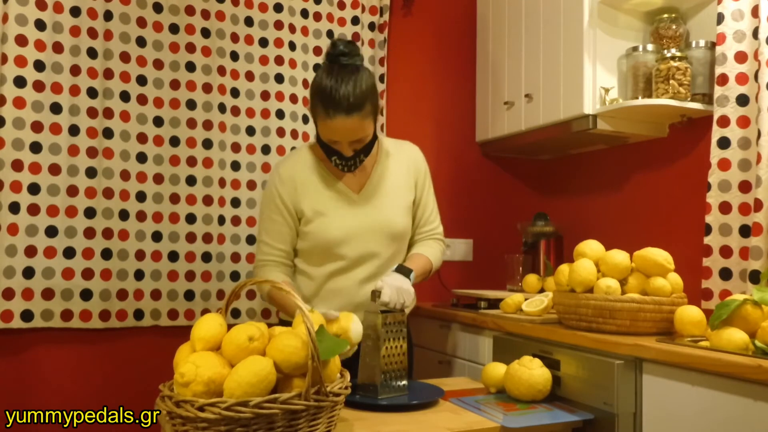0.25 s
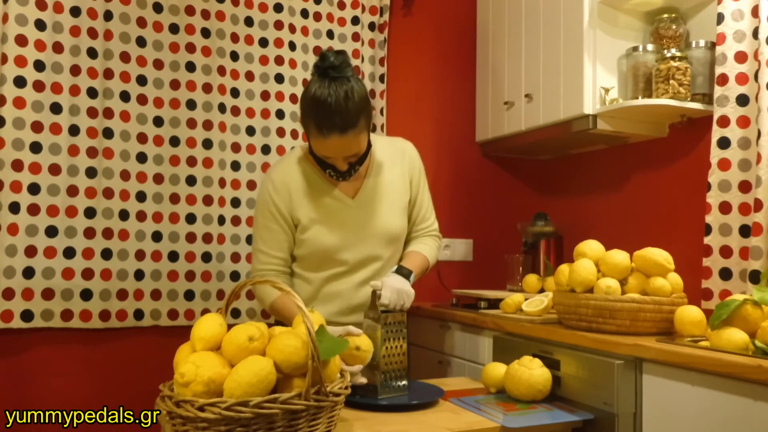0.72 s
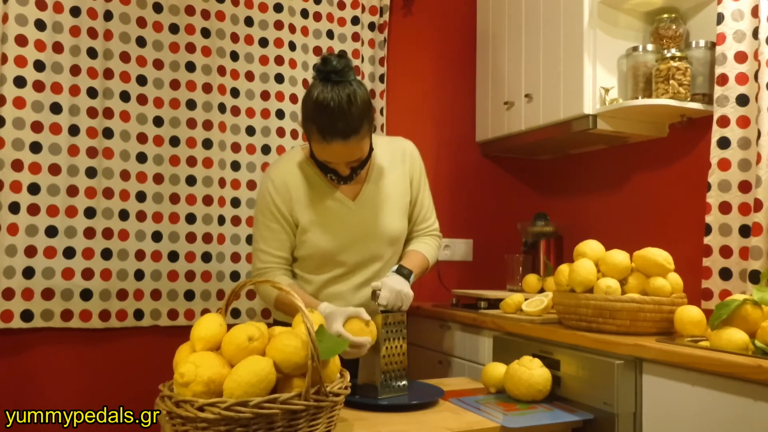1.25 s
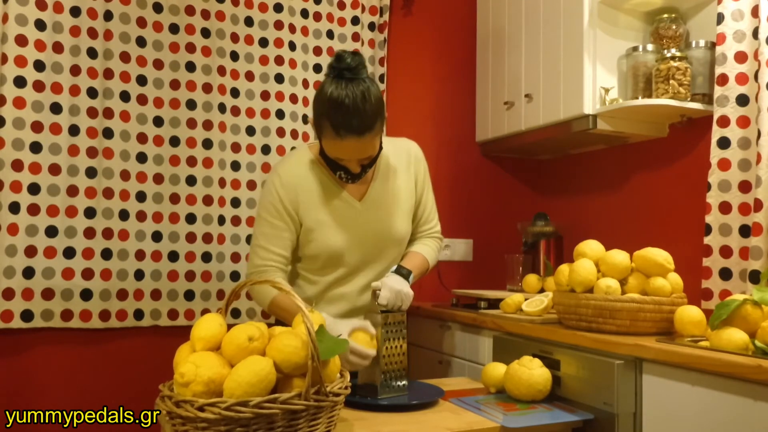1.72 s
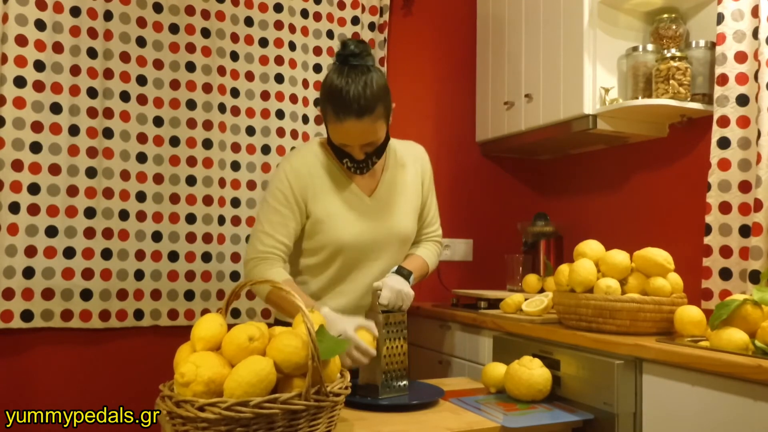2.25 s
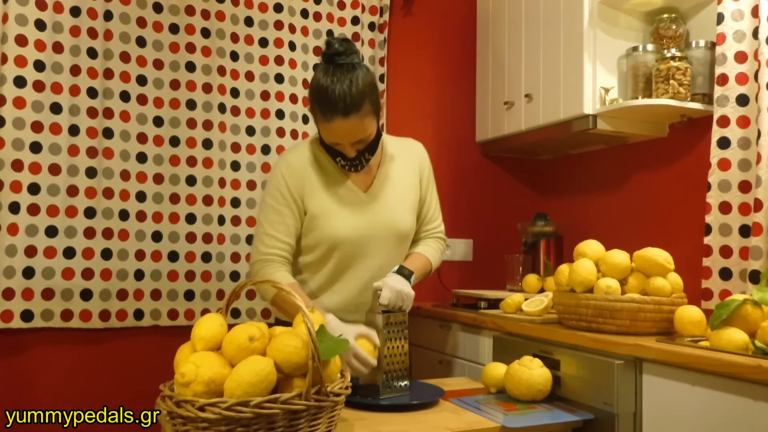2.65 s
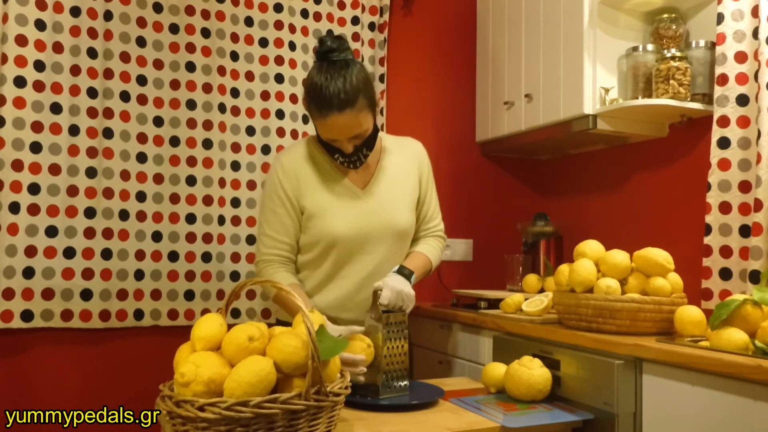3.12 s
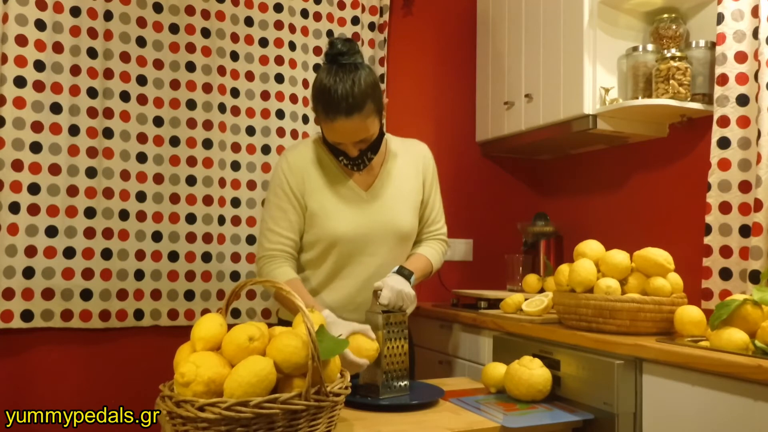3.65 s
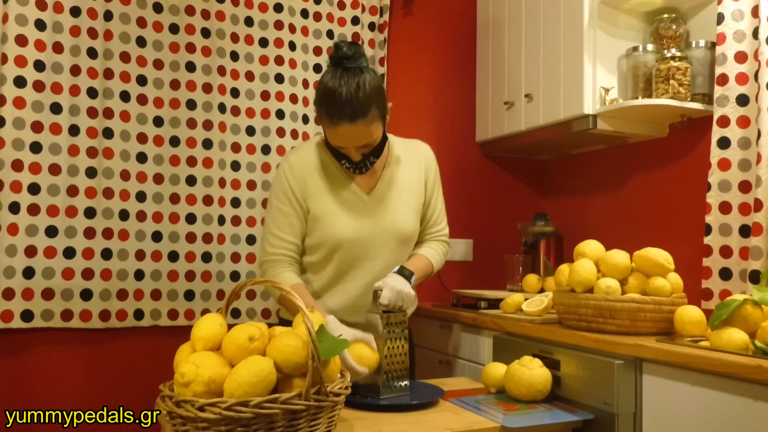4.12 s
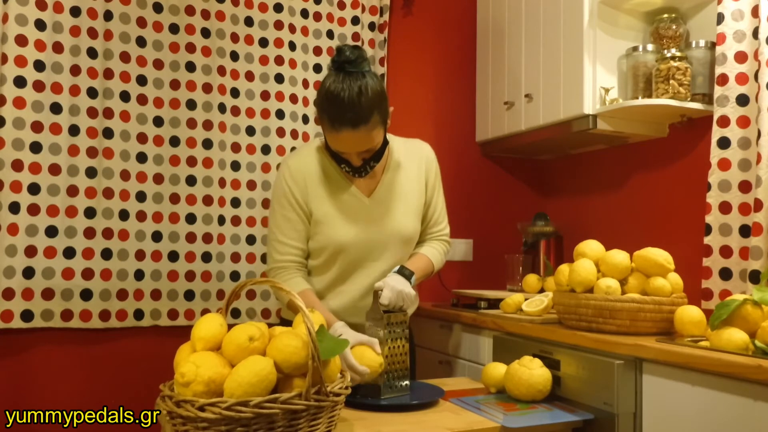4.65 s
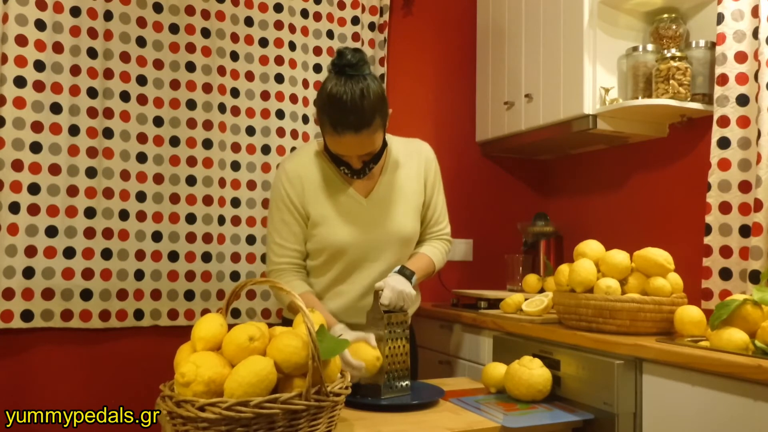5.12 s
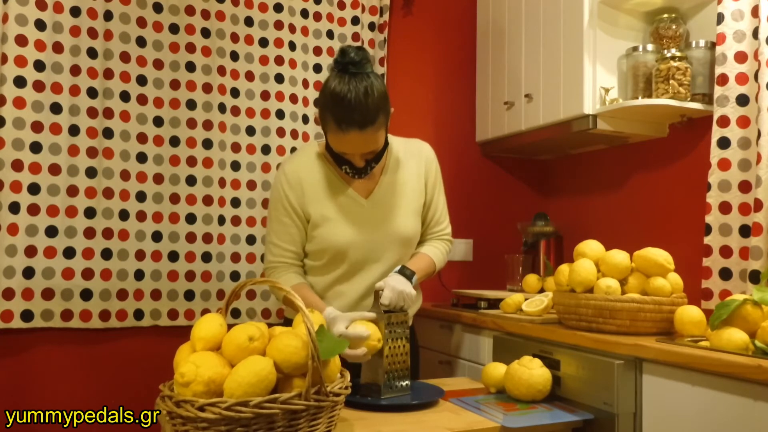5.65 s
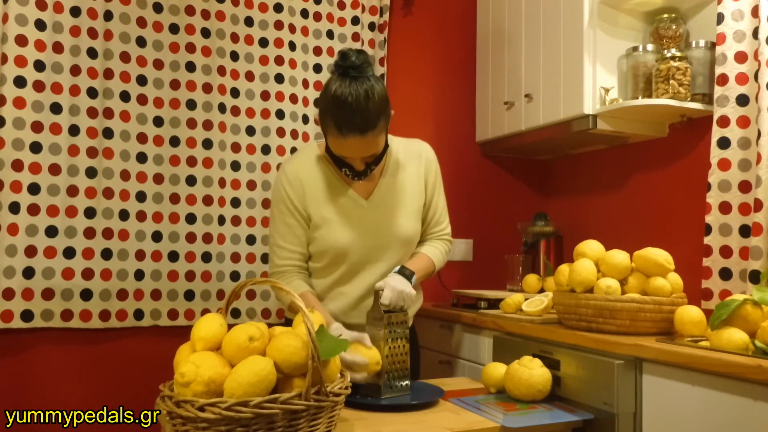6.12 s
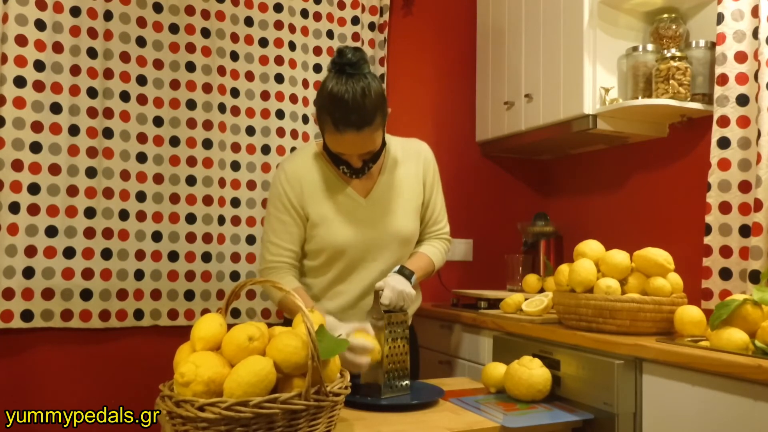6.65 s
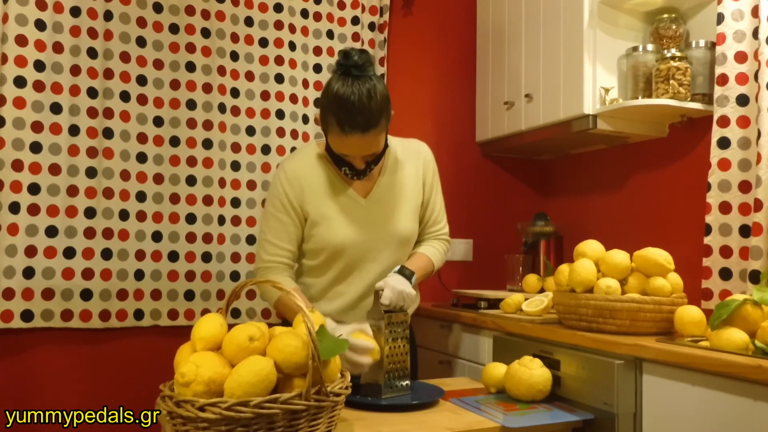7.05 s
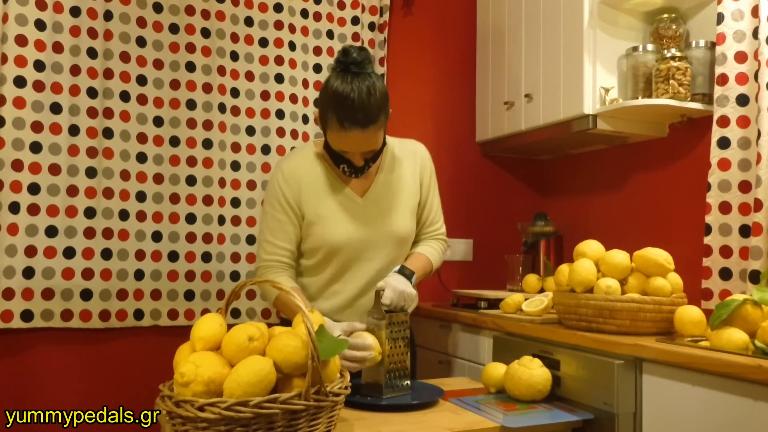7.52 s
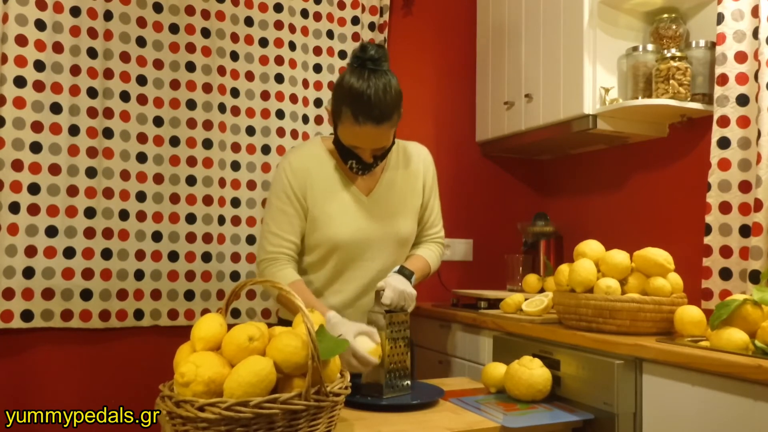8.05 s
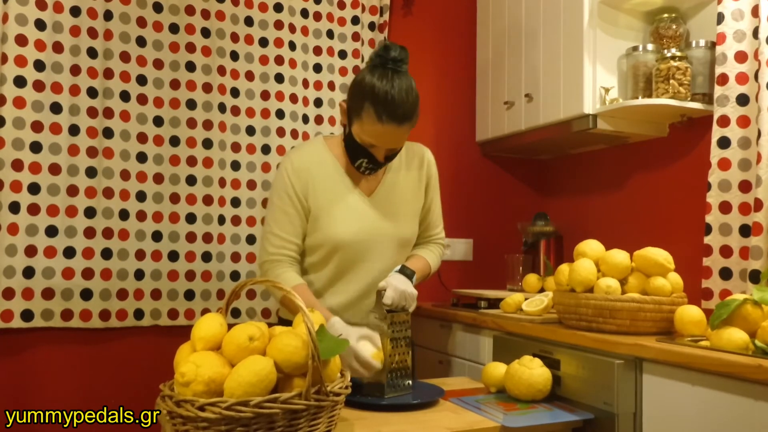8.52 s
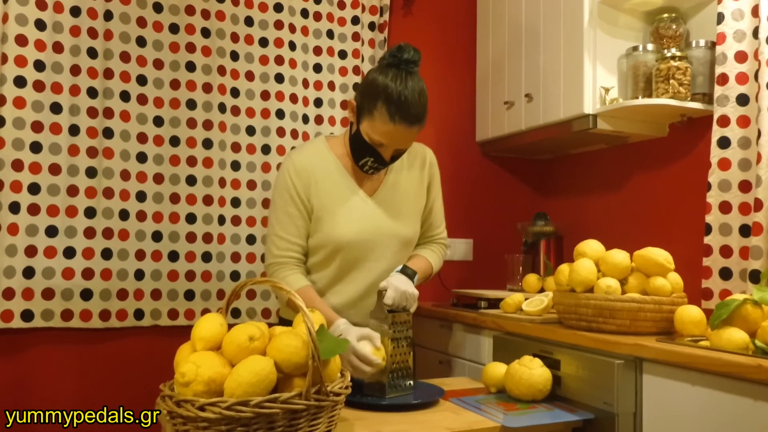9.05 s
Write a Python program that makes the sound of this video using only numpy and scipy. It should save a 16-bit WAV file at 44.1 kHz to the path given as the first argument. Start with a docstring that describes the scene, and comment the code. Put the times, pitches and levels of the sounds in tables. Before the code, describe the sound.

Quick rasping strokes of lemon peel against a steel grater come in four bursts over a faint room hiss.

```python
"""Zesting a lemon on a box grater

A steel grater stands on a plate in a small kitchen: four runs of five to seven firm down-strokes, with
light returns between. The teeth snag and tear the peel; each snag rings the box and gives a bright rasp.
Now and then the fruit catches and knocks the box or makes it sing. Dry ticks sound over a room hiss."""
import sys
import numpy as np
from scipy import signal
from scipy.fft import rfft, irfft, next_fast_len
from scipy.io import wavfile

SR = 44100
rng = np.random.default_rng(int(sys.argv[2]) if len(sys.argv) > 2 else 0)


def log_audio(samples):
    """Write samples as a 16-bit WAV file to the path given in sys.argv[1]."""
    # one column per channel
    frames = np.atleast_2d(samples).T
    # limit to full scale, then quantise
    limited = np.clip(frames, -1, 1)
    pcm = np.round(limited * 32767).astype(np.int16)
    wavfile.write(sys.argv[1], SR, pcm)


N = 410130
TIME = np.arange(N) / SR
CUTOFF_HZ = 13200


def from_db(db):
    """Decibels to gain."""
    return np.exp(np.asarray(db) * (np.log(10) / 20))


def unit_rms(x):
    """Scale to rms 1."""
    return x / np.sqrt(np.mean(x ** 2) + 1e-20)


def at_hz(curve, hz):
    """Read a curve on a log-frequency axis."""
    curve_hz, values = np.transpose(curve)
    return np.interp(np.log(hz), np.log(curve_hz), values)


def cut(x, hz, kind, order):
    """Butterworth filter."""
    return signal.sosfilt(signal.butter(order, hz, kind, fs=SR, output="sos"), x)


def panned(x, left_db):
    """Tip a sound sideways; left_db is left minus right."""
    return x * from_db([[left_db / 2], [-left_db / 2]])


def drift(rate_hz, at):
    """Smooth random modulation with rms 1, read at the given samples."""
    step, warm_up = 40, 2000
    pole = np.exp(-2 * np.pi * rate_hz * step / SR)
    noise = rng.standard_normal(N // step + warm_up + 2)
    slow = signal.lfilter([1], [1, -2 * pole, pole ** 2], noise)[warm_up:]
    return unit_rms(slow)[at // step]


def resonate(x, hz, width_hz):
    """A resonance that keeps the power of a white input."""
    radius = np.exp(-np.pi * width_hz / SR)
    zeros = np.sqrt((1 - radius ** 2) / 2) * np.array([1, 0, -1])
    poles = [1, -2 * radius * np.cos(2 * np.pi * hz / SR), radius ** 2]
    return signal.lfilter(zeros, poles, x + 1e-18)


def room_hiss(centre_gain):
    """A steady, dull bed of noise, nearly unrelated on the two sides."""
    # room tone spectrum: (frequency [Hz], relative density [dB])
    spectrum = [(15, -73), (25, -36), (92, -19), (130, -16.5), (192, -9.5), (237, -8), (333, -3), (400, -3),
                (481, -1), (770, -2), (1230, -4), (2370, -13.5), (3160, -21.5), (4690, -21), (13000, -38)]
    size = next_fast_len(N)
    left, right, centre = rng.standard_normal((3, size))
    white = np.array([left, right]) + centre_gain * centre
    hz = np.arange(1, size // 2 + 2) * SR / size
    return unit_rms(irfft(rfft(white) * from_db(at_hz(spectrum, hz)), size)[:, :N])


def kitchen(x, dull_t60, bright_t60, wet_db, side_db, scatter_hz, early_db, early_s):
    """Dense reflections widen the lows and trail the treble; the first, off the worktop, sound metallic."""
    t = TIME[:SR // 2]
    mid, side = rng.standard_normal((2, len(t))) * (t > .001)
    scattered = cut(mid, scatter_hz, "high", order=2)
    diffuse = scattered + from_db(side_db) * side * [[1], [-1]]
    dull = cut(diffuse, 2000, "low", order=1)
    tail = dull * 1000 ** (-t / dull_t60) + (diffuse - dull) * 1000 ** (-t / bright_t60)
    tail /= np.sqrt(np.sum(tail ** 2) / 2)
    early = cut(scattered, 1630, "high", order=2) * np.exp(-t / early_s)
    response = from_db(wet_db) * tail + from_db(early_db) * early / np.linalg.norm(early)
    return x + signal.fftconvolve(x, response, axes=1)[:, :N]


def squeak(time_s, half_s, hz, level_db):
    """One brief, thin whistle."""
    return from_db(level_db) * np.exp(-((TIME - time_s) / half_s) ** 2) * np.sin(2 * np.pi * hz * TIME)


def dry_ticks(attack_s, lag_s):
    """Small damped ticks close by on the left; they reach the right side a little later."""
    # tick cues: (time [s], relative level [dB], top mode [Hz], left minus right [dB])
    cues = [(0.5101, -21, 2030, 8.5), (3.4588, -25.5, 2020, 5), (7.7589, -22, 2050, 6.9),
            (8.7093, -26.5, 1960, 8)]
    # ring of a tick: (frequency / top mode [ratio], relative level [dB], t60 [s])
    modes = [(.3, -12, 0.049), (.39, 7.5, 0.01), (.53, -1.5, 0.017), (.66, 2.5, 0.015), (.85, 8.5, 0.013),
             (1.0, 3.5, 0.02)]
    out = np.zeros((2, N))
    for time_s, level_db, top_hz, left_db in cues:
        span = slice(int(time_s * SR), int(time_s * SR) + SR // 20)
        t = np.maximum(TIME[span] - time_s - np.array([[0], [lag_s]]), 0)
        ring = sum(from_db(db) * 1000 ** (-t / t60) * np.sin(2 * np.pi * ratio * top_hz * t)
                   for ratio, db, t60 in modes)
        out[:, span] += panned(from_db(level_db) * ring * (1 - np.exp(-t / attack_s)), left_db)
    return cut(cut(out, 2350, "low", order=4), 400, "high", order=2)


def singing_steel(half_s, waver):
    """As a stroke slows, the peel sticks and slips and the face sings; the uneven grip bends the pitch."""
    # swelling notes: (peak time [s], pitch [Hz], relative level [dB])
    notes = [(2.717, 1080, -33), (2.76, 1075, -43), (3.929, 1063, -32.5), (4.135, 1052, -36),
             (4.195, 1095, -35.5), (4.41, 1060, -38), (4.906, 1058, -37), (6.113, 1072, -30.5),
             (6.352, 1034, -35), (6.388, 1002, -36), (6.654, 1070, -39), (8.53, 1065, -35)]
    out = np.zeros(N)
    for time_s, hz, level_db in notes:
        span = int(time_s * SR) + np.arange(-SR // 10, SR // 10)
        phase = 2 * np.pi * np.cumsum(hz * (1 + waver * drift(102, span))) / SR
        swell = np.exp(-((TIME[span] - time_s) / half_s) ** 2)
        out[span] += from_db(level_db) * swell * np.sqrt(2) * np.sin(phase)
    return out


def stroke(bite_s, hold_s, level_db, attack_s, slope_db_per_s, release_s):
    """Power envelope of one stroke: a rounded attack, a sloping hold, a release that dies away."""
    span = slice(max(0, int((bite_s - .1) * SR)), int((bite_s + .3) * SR))
    t = TIME[span] - bite_s
    attack = np.exp(-(np.maximum(-t, 0) / attack_s) ** 1.99)
    hold = from_db(level_db + slope_db_per_s * np.clip(t, 0, hold_s)) ** 2
    release = np.exp(-np.maximum(t - hold_s, 0) / release_s)
    power = np.zeros(N)
    power[span] = attack * hold * release
    return power


def hand():
    """Strokes of a bumpy fruit that presses unevenly; returns envelopes for walls, body and peel."""
    # firm down-strokes; the hollow body answers by where the fruit bears on the face:
    # (bite time [s], hold [s], relative level [dB], body over walls [dB])
    down_strokes = [(1.382, .051, -35, -2.5), (1.636, 0.037, -33, -1), (1.906, 0.018, -31.5, -4),
                    (2.154, 0.039, -31.5, -3), (2.415, 0.026, -31, -2), (2.668, 0.049, -34.5, -3),
                    (3.612, 0.012, -34, -4.5), (3.888, 0.012, -29.5, -5), (4.121, 0.026, -29.5, -3),
                    (4.376, 0.034, -31, -0.5), (4.625, 0.019, -31.7, -1.5), (4.873, 0.023, -31.5, -1),
                    (5.122, 0.035, -32, -0.5), (6.068, 0.036, -32, -1.5), (6.313, 0.031, -31, -1.5),
                    (6.577, 0.023, -30, 0), (6.826, .038, -32, -2.5), (7.093, 0.027, -31.5, -6),
                    (7.335, 0.038, -32.5, -3), (7.972, .045, -38, 0.5), (8.25, 0.027, -31, -2),
                    (8.524, 0.036, -32.5, -1), (8.785, .03, -32.5, -2.5), (9.061, 0.021, -36.5, 0)]
    # returns and faint brushes of the teeth: (bite time [s], hold [s], relative level [dB])
    light_strokes = [(.765, 0.018, -54), (1.08, 0.086, -44.5), (1.264, 0.0087, -40), (1.509, 0.019, -38),
                     (1.754, 0.034, -42.5), (2.028, .032, -40), (2.275, 0.046, -40), (2.526, 0.039, -39.5),
                     (2.83, 0.058, -50), (3.742, 0.041, -43.5), (4.004, 0.016, -38), (4.229, .058, -40),
                     (4.499, 0.023, -35.5), (4.743, 0.035, -37), (4.996, 0.026, -38), (5.532, 0.021, -54),
                     (5.794, 0.036, -52), (5.94, 0.026, -44), (6.185, 0.035, -37.5), (6.445, 0.023, -36.5),
                     (6.699, 0.026, -36), (6.964, 0.028, -39), (7.2, 0.037, -38), (8.115, 0.026, -39.5),
                     (8.38, 0.033, -39), (8.645, 0.045, -40.5), (8.923, 0.026, -42.5), (9.224, 0.046, -46)]
    walls, body, peel = np.zeros((3, N))

    def rub(bite_s, hold_s, level_db, body_db, rasp_db, attack_s, lean_db_per_s):
        """The box swells as the hand leans in; the rasp starts just ahead and sags as the fruit slows."""
        push = stroke(bite_s, hold_s, level_db, attack_s, lean_db_per_s, release_s=0.016)
        walls[:] += push
        body[:] += push * from_db(body_db) ** 2
        peel[:] += stroke(bite_s, hold_s, level_db + rasp_db, attack_s + 0.0014,
                          slope_db_per_s=-11, release_s=0.014)

    for row in down_strokes:
        rub(*row, rasp_db=-9.5, attack_s=0.019, lean_db_per_s=23)
    for row in light_strokes:
        rub(*row, body_db=-1.5, rasp_db=-10.5, attack_s=0.016, lean_db_per_s=18)
    pressure = from_db(0.47 * drift(40, np.arange(N)))
    return np.sqrt([walls, body, peel]) * pressure


def tooth_snags(per_s, spread_db, judder_db, judder_hz):
    """Teeth let go of the peel at random; the impulses swell and shrink as the fruit judders."""
    size_db = spread_db * np.clip(rng.standard_normal(N), -2, 2)
    size_db += judder_db * drift(judder_hz, np.arange(N))
    return unit_rms(from_db(size_db) * (rng.random(N) < per_s / SR))


def peel_rasp(snags, tear_s, slide_power, patchy_db, low_hz, bands):
    """Each snag tears the peel in a short bright burst, over the even hiss of sliding."""
    # colour of the tearing: (frequency [Hz], relative band gain [dB])
    colour = [(1800, 2), (2400, -11.5), (3000, 4), (3300, -1.5), (4000, 1), (4700, -4.5), (5600, -3),
              (7000, -6.5), (8300, -6), (10000, -11.5), (11300, -16), (12500, -53), (13200, -32)]
    # stereo image: (frequency [Hz], left-right likeness [ratio, clipped to -1..1])
    image = [(2000, -1.3), (3000, 0.95), (6200, 0.29), (9500, -0.077), (13500, 0.23)]
    decay = np.exp(-1 / (tear_s * SR))
    burst_power = signal.lfilter([1 - decay], [1, -decay], snags ** 2 + 1e-18)
    noises = rng.standard_normal((2, 2, N))   # neighbouring bands get unrelated noise
    edges = np.geomspace(low_hz, CUTOFF_HZ, bands + 1)
    mid_side = np.zeros((2, N))
    for k, band in enumerate(zip(edges, edges[1:])):
        hz = np.sqrt(band[0] * band[1])
        likeness = np.clip(at_hz(image, hz), -1, 1)
        spread = np.sqrt([[1 + likeness], [1 - likeness]])
        gain = from_db(at_hz(colour, hz) + patchy_db * drift(17, np.arange(N)))
        mid_side += cut(noises[k % 2], band, "band", order=2) * gain * spread
    mid, side = mid_side
    return unit_rms(np.array([mid + side, mid - side]) * np.sqrt(burst_power + slide_power))


def grater_ring(snags, walls, body, body_top_hz, wander_db, grip_hz, knock_db, knock_octaves):
    """Every snag rings each mode with its own strength; the mix wanders as the fruit travels."""
    # modes of the grater on its plate: (frequency [Hz], ungripped width [Hz], relative power [dB])
    modes = [(158.7, 6.4, -23.5), (201.4, 9.7, -14), (246.2, 6.6, -14.5), (256.7, 12.5, -11.5),
             (331, 16, -0.5), (380, 110, -10), (459.7, 26, -4.5), (509, 42, -7.5), (532.2, 27, -2.5),
             (552.5, 12, -10.5), (652, 43, -4), (750, 140, -22), (756, 37, -2.5), (816.6, 12.3, -1.5),
             (913.5, 41, 1.5), (1013.5, 15.5, 0.5), (1066, 14.8, 1.5), (1136, 20, -3.5), (1216, 31, 1),
             (1290, 14.5, -0.5), (1425, 70, -2.5), (1456, 103, -1.5), (1568, 28, -2), (1680, 13, -14.5),
             (1692, 31, -3.5), (1786, 28, -5), (1910, 38, -0.5), (1998, 110, -2), (2260, 67, -11),
             (2346, 190, -5.5)]
    # the fruit catches and knocks the box: (time [s], relative strength [dB], ring centre [Hz])
    catches = [(1.375, -10, 450), (1.636, -17, 1400), (2.139, -11, 450), (2.418, -10, 660),
               (3.872, -25, 1520), (3.907, -10, 950), (4.115, -7, 940), (4.406, -8, 535), (4.631, -16, 570),
               (4.735, -17, 900), (5.108, -11, 800), (6.052, -20, 1100), (6.072, -14, 880),
               (6.808, -16, 400), (6.853, -8, 510), (7.087, -7.5, 460), (7.119, -9, 460),
               (7.364, -12.5, 1400), (8.803, -13, 1020)]
    hz, width_hz, mode_db = np.transpose(modes)
    in_body, gain = hz < body_top_hz, from_db(mode_db)
    gain /= np.where(in_body, np.linalg.norm(gain[in_body]), np.linalg.norm(gain[~in_body]))
    knock_s, strength_db, knock_hz = np.transpose(catches)
    snag_at, knock_at = np.flatnonzero(snags), np.round(knock_s * SR).astype(int)
    out = np.zeros(N)
    for k in range(len(hz)):
        envelope = body if in_body[k] else walls
        polarity = rng.choice([-1, 1], len(snag_at))
        wander = from_db(wander_db * drift(9.2, snag_at))
        force = snags * envelope
        force[snag_at] *= polarity * wander
        # a catch drives the modes near its pitch; neighbours swing against each other, so it blooms
        nearness = 1 / (1 + (np.log2(hz[k] / knock_hz) / knock_octaves) ** 2)
        force[knock_at] += (-1) ** k * from_db(strength_db + knock_db) * nearness
        gripped_width_hz = np.hypot(width_hz[k], grip_hz)   # the holding hand damps the longest rings
        out += gain[k] * resonate(force, hz[k], gripped_width_hz)
    return cut(cut(out, 147, "high", order=6), 3020, "low", order=4)


def scene():
    """Grater and peel a little to the right, in the kitchen; ticks, squeak and hiss stay dry."""
    walls, body, peel = hand()
    snags = tooth_snags(per_s=1600, spread_db=2.5, judder_db=0.3, judder_hz=65)
    box = grater_ring(snags, from_db(-0.5) * walls, from_db(-0.53) * body, body_top_hz=730,
                      wander_db=1.66, grip_hz=3.5, knock_db=12, knock_octaves=0.36)
    face = from_db(-0.8) * singing_steel(half_s=0.019, waver=0.022)
    rasp = peel_rasp(snags, tear_s=0.0045, slide_power=0.37, patchy_db=2.0, low_hz=1900, bands=16)
    direct = panned(box + face, -1.84) + panned(from_db(1.0) * peel * rasp, -2.0)
    grating = kitchen(direct, dull_t60=0.07, bright_t60=0.3, wet_db=-9.5, side_db=-4.5,
                      scatter_hz=1700, early_db=-14.0, early_s=0.0054)
    hiss = panned(from_db(-47) * room_hiss(centre_gain=0.22), -0.25)
    whistle = squeak(time_s=0.592, half_s=0.018, hz=2620, level_db=-59)
    ticks = dry_ticks(attack_s=0.0029, lag_s=0.00006)
    return hiss + whistle + ticks + grating


def record(dry):
    """A steep low-pass takes off the very top."""
    return signal.sosfilt(signal.ellip(10, .1, 80, CUTOFF_HZ, fs=SR, output="sos"), dry)


dry = scene()
out = record(dry)
log_audio(out)
```